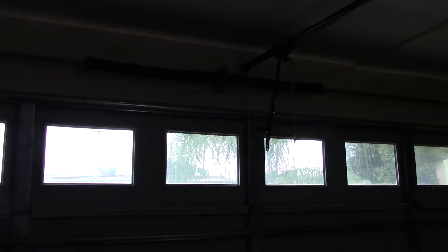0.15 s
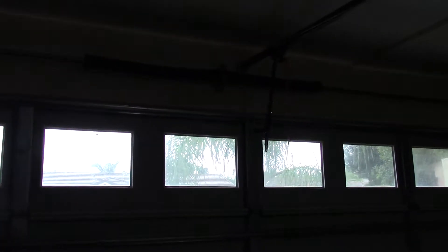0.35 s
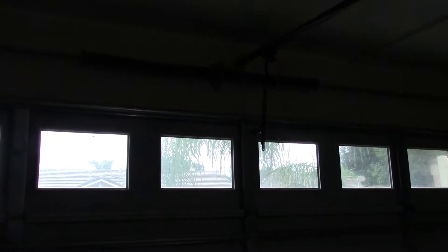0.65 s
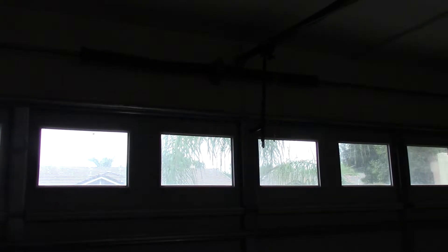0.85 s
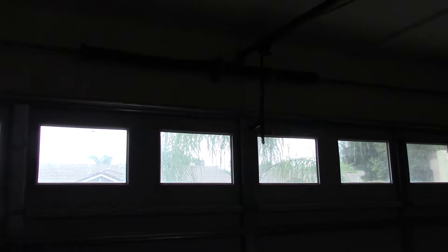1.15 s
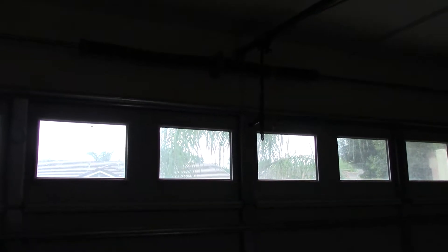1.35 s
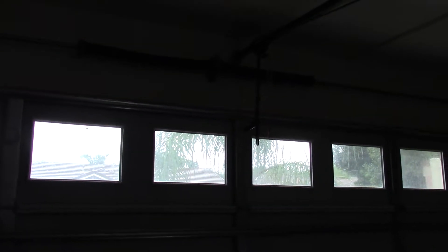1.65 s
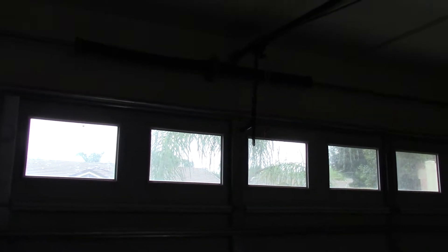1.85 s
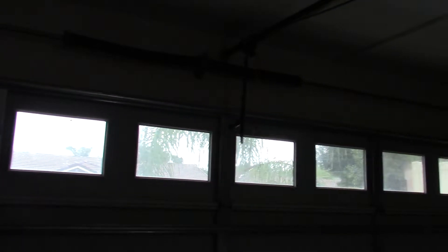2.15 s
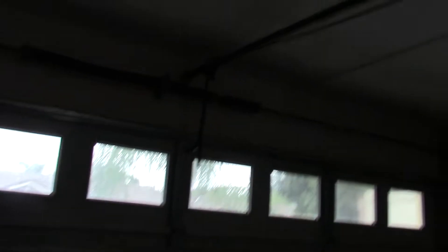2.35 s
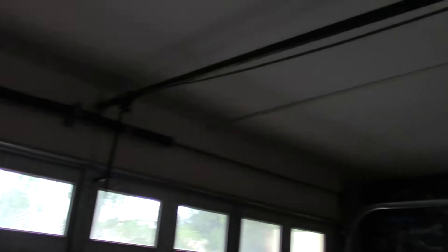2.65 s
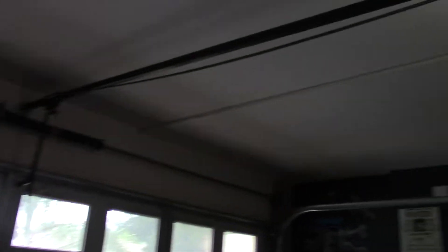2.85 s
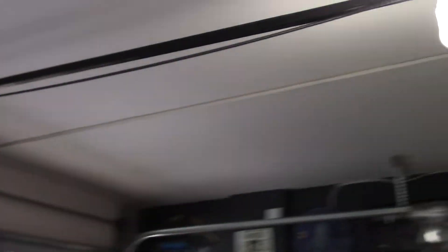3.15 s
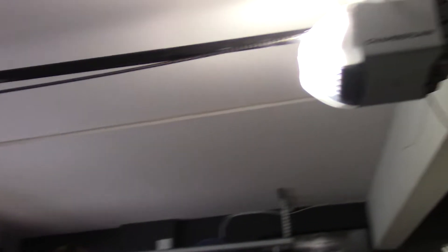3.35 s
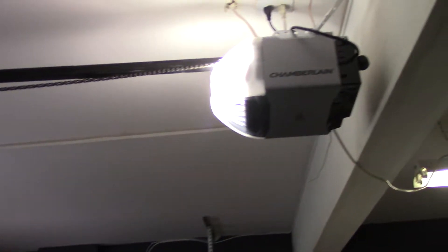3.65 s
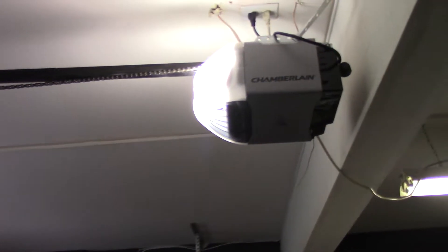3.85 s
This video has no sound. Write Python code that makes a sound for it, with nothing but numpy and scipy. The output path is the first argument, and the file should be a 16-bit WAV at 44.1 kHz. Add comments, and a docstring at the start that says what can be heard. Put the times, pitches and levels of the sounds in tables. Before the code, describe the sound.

A garage door rolls down from the start, its motor humming low while rollers rumble, panels boom, hinges clack and small high squeaks slip through. Around 0.85-0.97 s metal whines and rough thuds land; the motor stops and the garage rings out, with a weak knock at 1.27. Then quiet hiss and low drone, faint camera ticks from 1.7, dull far bumps around 1.5, 2.05, 2.9 and 3.1, and a close plastic click at 3.7.

```python
"""In a garage, a ceiling motor hums while a panel door rolls down its last stretch, squeaks and thuds home.
Rough noise shakes resonant panels and tracks; short noise bursts and dying tones make clacks and blows.
The hum is a stack of sines. Decaying random echoes let the garage ring out.
In the quiet come dull far bumps, faint camera ticks and one close click, over hiss and a low drone."""
import sys
import numpy as np
from scipy import signal
from scipy.fft import rfft, irfft
from scipy.io import wavfile

SR = 44100
rng = np.random.default_rng(int(sys.argv[2]) if len(sys.argv) > 2 else 0)


def wav_record(signal):
    """Record a signal, one row per channel, as 16-bit PCM in the file named by sys.argv[1]."""
    frames = np.transpose(np.atleast_2d(signal))
    bounded = np.clip(frames, -1, 1)
    # unit amplitude maps onto the largest positive 16-bit level
    quanta = np.round(bounded * 32767).astype(np.int16)
    wavfile.write(sys.argv[1], SR, quanta)


N = 176400  # samples, four seconds


def amp(db):
    """Turns decibels into a gain."""
    return 10 ** (np.asarray(db) / 20)


def evened(x):
    """Scales a sound to an RMS of 1."""
    return x / np.sqrt(np.mean(x ** 2) + 1e-20)


def read(points, hz):
    """Reads a curve of (Hz, value) points along log frequency."""
    f, value = np.transpose(points)
    return np.interp(np.log(hz + 1), np.log(f + 1), value)


def add(mix, s, sound):
    """Lays a sound into the mix at s seconds, cut at the end of the mix."""
    part = mix[..., round(s * SR):][..., :sound.shape[-1]]
    part += sound[..., :part.shape[-1]]


def colour(x, points, tilt_db=0):
    """Filters by a spectrum, tilted in dB per octave about 2 kHz."""
    hz = np.fft.rfftfreq(len(x), 1 / SR)
    gain_db = read(points, hz) + tilt_db * np.log2((hz + 100) / 2000)
    return irfft(rfft(x) * amp(gain_db), len(x))


def above(x, hz):
    """Cuts the lows with a second-order high-pass."""
    return signal.sosfilt(signal.butter(2, hz, "high", fs=SR, output="sos"), x)


def resonate(x, hz, width_hz):
    """A two-pole resonance at a steady pitch; a narrower width rings longer."""
    r = np.exp(-np.pi * width_hz / SR)
    return signal.lfilter([1 - r, 0, r - 1], [1, -2 * r * np.cos(2 * np.pi * hz / SR), r * r], x)


def glide(x, hz, width_hz):
    """A resonance that follows a pitch curve: shifts it to zero, smooths, shifts back."""
    turn = np.exp(2j * np.pi * np.cumsum(hz) / SR)
    r = np.exp(-np.pi * width_hz / SR)
    return 2 * (turn * signal.lfilter([1 - r], [1, -r], x / turn)).real


def drift(rate_hz):
    """Slow chance: straight lines between random values drawn rate_hz times a second."""
    knots = rng.standard_normal(1200)
    return np.interp(np.arange(N) / SR * rate_hz, np.arange(1200), knots)


def ring(modes, seconds, scatter_db=0):
    """Dying tones after one blow, each level scattered by chance, peak 1."""
    t = np.arange(round(seconds * SR)) / SR
    x = np.zeros(len(t))
    for hz, db, t60 in modes:
        level_db = db + scatter_db * rng.standard_normal()
        x += amp(level_db - 60 * t / max(t60, .002)) * np.sin(2 * np.pi * hz * t)
    return x / abs(x).max()


def burst(spectrum, tilt_db, t60, rise_s):
    """A dying rattle of coloured noise with a short linear rise."""
    t = np.arange(16384) / SR
    noise = evened(colour(rng.standard_normal(len(t)), spectrum, tilt_db))
    return noise * np.minimum(t / rise_s, 1) * amp(-60 * t / max(t60, .004))


# The rolling door. Each row: time in seconds, panel boom, roller rumble, metal whine and track hiss in dB.
ROLL = [(0.03, -35.5, -28, -66, -46), (0.246, -43.5, -26, -41, -45.5), (0.34, -43.5, -25.5, -36.5, -45),
        (0.596, -23.5, -24, -36.5, -44.5), (0.83, -25.5, -24.5, -54.5, -41),
        (0.885, -33, -18.5, -19.5, -44.5), (0.91, -29.5, -20, -40, -26), (0.968, -30, -48.5, -65, -85.5),
        (1.03, -50.5, -34.5, -73, -98), (1.08, -96, -25, -68, -78)]
ROLL_STOP_S = .03  # after the last row, time to die by 60 dB
# Panel resonances. Each row: pitch in Hz, width in Hz, level in dB.
BOOM = [(294, 35, 3), (336, 25, 4), (363.5, 22, 3), (395.7, 17, 4.5)]
# Whining thin metal. Each row: pitch in Hz at half a second, width in Hz, level in dB.
WHINE = [(2540, 70, -6), (3050, 70, -7), (3320, 75, -1), (3630, 80, 2), (4500, 200, -10)]
WHINE_WANDER, WHINE_SAG_PER_S = 0.0042, .08  # shares of the pitch
WHINE_BED_HZ, WHINE_BED_WIDTH_HZ, WHINE_BED_DB = 3500, 1200, -12.5
# Roller rumble spectrum. Each row: frequency in Hz, relative level in dB per Hz.
RUMBLE = [(40, -57), (90, -14), (180, -8), (300, -6.5), (500, -7), (800, -4.5), (1080, -6.5), (1600, -10.5),
          (2500, -16), (5000, -31), (8000, -69.5)]
RUMBLE_LUMP_DB = 2
# Track hiss spectrum. Each row: frequency in Hz, relative level in dB per Hz.
HISS = [(2350, -22.5), (4000, -4.5), (5910, -4), (9640, -17), (15100, -47.5), (16100, -38), (16400, -57)]
GRIT_PER_S, GRIT_SPREAD_DB, GRIT_SHARE = 1500, 1, 0.4


def rolling():
    """Gritty rollers shake the panels, the tracks and thin metal parts."""
    t, table = np.arange(N) / SR, np.transpose(ROLL)

    # sparse clicks of either sign, mixed with steady noise
    grain = amp(GRIT_SPREAD_DB * np.minimum(rng.exponential(1, N), 5))
    grit = grain * (rng.random(N) < GRIT_PER_S / SR) * rng.choice([-1, 1], N)
    drive = GRIT_SHARE * evened(grit) + (1 - GRIT_SHARE) * rng.standard_normal(N)

    boom = sum(amp(db) * evened(resonate(resonate(drive, hz, 2 * width), hz, width))
               for hz, width, db in BOOM)

    whine = np.zeros(N)
    sag = WHINE_SAG_PER_S * (np.minimum(t, 1.2) - .5)
    for hz, width, db in WHINE:
        pitch = hz * (1 + WHINE_WANDER * drift(11.0) - sag)
        whine += amp(db + 2 * drift(11.0)) * evened(glide(drive, pitch, width))
    bed = resonate(drive, WHINE_BED_HZ, WHINE_BED_WIDTH_HZ)
    bed = resonate(bed, WHINE_BED_HZ, WHINE_BED_WIDTH_HZ)
    whine = evened(whine) + amp(WHINE_BED_DB) * evened(bed)

    rumble = colour(drive, RUMBLE) * amp(RUMBLE_LUMP_DB * drift(29.6))
    layers = boom, rumble, whine, colour(drive, HISS)
    out = sum(evened(x) * amp(np.interp(t, table[0], db)) for x, db in zip(layers, table[1:]))
    return out * amp(-60 * np.clip((t - table[0, -1]) / ROLL_STOP_S, 0, 3))


# The door slab. Each row: nominal pitch in Hz, level in dB before scatter and tilt, t60 in seconds.
SLAB = [(170, -12, .1), (255, -1, .12), (295, 0, .13), (335, 0, .14), (400, -4, .14), (500, -3, .1),
        (670, -5, .08), (830, -12, .08), (1200, -9, .08), (1800, -12, .06)]
SLAB_DETUNE = .08  # share of the pitch; each blow shifts the slab's tones a little by chance
BLOW_T60 = 0.0084  # seconds


def thud(db, tilt_db):
    """A short rough blow sets the door slab ringing."""
    t = np.arange(2000) / SR
    modes = [(hz * (1 + SLAB_DETUNE * rng.uniform(-1.1, 1)), level + tilt_db * np.log2(hz / 400), t60)
             for hz, level, t60 in SLAB]
    slab = ring(modes, .4, 1.8)
    blow = rng.standard_normal(2000) * amp(-60 * t / BLOW_T60)
    x = above(np.convolve(blow, slab), 80)
    return amp(db) * x / abs(x).max()


# The door meeting the floor. Each row: start in seconds, level in dB, brightness in dB per octave.
THUDS = [(.862, -16, 3), (.884, -11, 3), (.908, -6, -2), (0.957, -12, -2), (1.27, -28, 4)]


def thuds():
    """The landing blows, each a fresh ring of the slab."""
    out = np.zeros(N)
    for s, db, tilt_db in THUDS:
        add(out, s, thud(db, tilt_db))
    return out


# Ringing steel hardware. Each row: pitch in Hz, level in dB before scatter and shaping, t60 in seconds.
STEEL = [(3740, -7, .22), (5100, -5, .07), (6600, -6, .05), (7800, 0, .06), (9100, 1, .07),
         (10600, -6, .04), (12200, -6, .05)]
STEEL_DB, STEEL_SCATTER_DB = -5, 3
CLACK_RISE_S, CLACK_TOP_HZ, RATTLE_DB = .001, 14500, 2


def clack(db, hz, octaves, t60):
    """A rough steel rattle around one pitch region, with the ring of the hardware."""
    def shape(f):
        return -6 * (np.log2(f / hz) / max(octaves, .2)) ** 2 - 12 * (f / CLACK_TOP_HZ) ** 8

    spectrum = [(f, shape(f)) for f in np.geomspace(300, 17000, num=24)]
    rattle = burst(spectrum, 0, t60, CLACK_RISE_S)
    steel = ring([(f, level + shape(f), t) for f, level, t in STEEL], .37, STEEL_SCATTER_DB)
    flutter = amp(RATTLE_DB * drift(280)[:len(steel)])
    return amp(db) * (rattle[:len(steel)] * flutter + amp(STEEL_DB) * steel)


# Hinges and rollers. Each row: start in seconds, level in dB, centre of the rattle in Hz,
# width in octaves, t60 of the rattle in seconds.
CLACKS = [(0.121, -27.5, 8100, 11, 0.13), (.347, -28.5, 4770, 0.36, 0.13), (.4305, -43, 12000, 0.41, 0.043),
          (.6135, -43, 9000, .8, 0.24), (0.683, -46, 11000, 0.91, 0.16), (0.718, -39, 8160, 0.65, 0.21),
          (0.776, -34.5, 7900, .7, 0.14), (0.8453, -20.5, 7800, .9, 0.19), (.8795, -18, 5040, 0.58, 0.13),
          (0.8901, -18.5, 3580, 1.13, 0.087), (0.8974, -19.5, 7380, 0.35, 0.14),
          (.915, -43, 4050, 1, 0.077), (.9545, -33.5, 12700, 0.63, 0.11), (1.04, -38.5, 2170, 0.28, 0.33),
          (1.105, -56, 10000, 0.42, 0.13), (1.159, -48, 6160, 0.57, 0.22),
          (1.2646, -42.5, 4580, 0.91, 0.17), (1.335, -55.5, 6040, 0.41, 0.12),
          (1.5615, -58, 11000, 0.66, 0.016)]


def clacks():
    """Hinge and roller clacks as the door comes down, and a few faint ones after it lands."""
    out = np.zeros(N)
    for s, *rest in CLACKS:
        add(out, s, clack(*rest))
    return out


# Squeaks. Each row: start in seconds, length in seconds, first pitch in Hz, last pitch in Hz,
# level in dB, level of the octave in dB against the base tone.
SQUEAKS = [(.168, .085, 6550, 6800, -40, -11), (.345, .025, 6400, 6400, -42, -40),
           (.612, .025, 6200, 6500, -40, -40)]
SQUEAK_THROB_HZ, SQUEAK_THROB = 109, 0.54


def squeaks():
    """Short tones with an octave, a jittery pitch and a fast throb, some of them gliding up."""
    out = np.zeros(N)
    for s, length, from_hz, to_hz, db, octave_db in SQUEAKS:
        t = np.arange(0, length, 1 / SR)
        pitch = from_hz + (to_hz - from_hz) * t / length + 40 * drift(190)[:len(t)]
        turn = 2 * np.pi * np.cumsum(pitch) / SR
        throb = 1 + SQUEAK_THROB * np.sin(2 * np.pi * SQUEAK_THROB_HZ * t)
        swell = np.sin(np.pi * t / length) ** 0.31
        add(out, s, amp(db) * swell * throb * (np.sin(turn) + amp(octave_db) * np.sin(2 * turn)))
    return out


HUM_HZ, HUM_STOP_S, HUM_FADE_S, HUM_WAVER_DB = 120.03, .94, 0.015, 2
# The motor. Each row: time in seconds, lowest hum tone in dB, second tone in dB, all overtones in dB.
MOTOR = [(0.03, -27, -26.5, -29), (0.31, -29.5, -24.5, -27), (0.426, -27.5, -19.5, -32),
         (0.512, -28, -28, -28.5), (0.7, -25.5, -19.5, -31), (0.828, -34, -28, -34.5),
         (0.898, -26, -47.5, -32.5), (0.93, -38, -17.5, -24.5)]
# Overtones. Each row: multiple of the hum, level in dB at half a second against the overtone curve,
# change in dB per second.
OVERTONES = [(3, -2.5, 8), (4, -3.5, 5.5), (5, -4.5, -4), (6, -5, 5), (8, -16.5, 0), (9, -8.5, 2.5)]


def motor():
    """Twice-mains hum with wavering overtones, cut by a short fade as the door comes down."""
    t = np.arange(N) / SR
    s, low_db, second_db, upper_db = np.transpose(MOTOR)
    tones = [(1, np.interp(t, s, low_db)), (2, np.interp(t, s, second_db))]
    for multiple, db, change_db in OVERTONES:
        level_db = db + change_db * (t - .5) + np.interp(t, s, upper_db)
        tones.append((multiple, level_db + HUM_WAVER_DB * drift(9.6)))
    hum = sum(amp(db) * np.sin(2 * np.pi * (multiple * HUM_HZ * t + rng.random()))
              for multiple, db in tones)
    fade = np.clip((HUM_STOP_S - t) / HUM_FADE_S + 1, 0, 1)
    return np.sqrt(2) * hum * fade  # the levels are RMS


# Camera ticks of the focus drive. Each row: start in seconds, level in dB.
TICKS = [(1.709, -51), (2.279, -51), (2.2975, -42.5), (2.398, -54), (2.4962, -52), (2.5471, -53),
         (2.6968, -51), (2.7641, -48), (2.797, -49), (2.8463, -45.5), (2.9981, -48), (3.063, -49),
         (3.2141, -49), (3.3655, -51), (3.3987, -47), (3.4477, -53), (3.5144, -51.5), (3.548, -56),
         (3.5997, -46), (3.6316, -51), (3.6646, -52), (3.7818, -48), (3.819, -48), (3.9317, -48),
         (3.9653, -47)]
# The tone of one tick. Each row: pitch in Hz, level in dB, t60 in seconds.
TICK = [(1620, 0, .035), (1830, -2, .03)]
STEP_HZ, STEP_FROM_S, STEP_DB, STEP_SPREAD_DB = 59.94, 1.7115, -61, 5  # fainter regular drive steps
CLICK_S, CLICK_LEFT_DB, CLICK_RIGHT_DB, CLICK_RISE_S = 3.7177, -11, -4, .0003
# Spectrum of the click's noise. Each row: frequency in Hz, relative level in dB per Hz.
SNAP = [(300, -12), (900, -15), (3200, -3), (5300, 0), (8000, -6), (11000, -13), (14000, -9), (16400, -14)]
SNAP_DB, SNAP_T60, SNAP_TAIL_DB, SNAP_TAIL_T60, TAIL_TILT_DB = -20, .008, -39, .035, -1
# The plastic shell, left and right. Each row: pitch in Hz, level in dB, t60 in seconds.
SHELL_LEFT = [(370, -20, .015), (1210, -16, .022), (1700, -1, .022), (2150, -6, .018), (2300, -3, .008),
              (2950, -6, .012), (3700, -17, .014)]
SHELL_RIGHT = [(370, -22, .015), (1210, -15, .02), (1720, -3, .016), (1980, -1, .012), (2160, -3, .017),
               (2550, -13, .014), (5300, -18, .018)]


def camera():
    """Faint ticks, and one click that rings the plastic shell differently left and right."""
    out = np.zeros((2, N))
    tick = above(ring(TICK, .05), 640)
    steps = np.arange(STEP_FROM_S, N / SR, 1 / STEP_HZ)
    faint = zip(steps, STEP_DB + STEP_SPREAD_DB * rng.standard_normal(len(steps)))
    for s, db in list(TICKS) + list(faint):
        add(out, s, amp(db) * np.array([tick, tick]))

    snap = amp(SNAP_DB) * burst(SNAP, 0, SNAP_T60, .0001)
    snap += amp(SNAP_TAIL_DB) * burst(SNAP, TAIL_TILT_DB, SNAP_TAIL_T60, 0.00081)
    add(out, CLICK_S, np.array([snap, snap]))
    for side, shell, db in (0, SHELL_LEFT, CLICK_LEFT_DB), (1, SHELL_RIGHT, CLICK_RIGHT_DB):
        body = ring(shell, .05)
        rise = np.minimum(np.arange(len(body)) / SR / CLICK_RISE_S, 1)
        body = -above(body * rise, 380)
        add(out[side], CLICK_S, amp(db) * body / abs(body).max())
    return out


# Far bumps. Each row: start in seconds, level in dB, brightness in dB per octave,
# level of the sharp knock in dB.
BUMPS = [(1.5, -58.5, 7, -51), (2.052, -50.5, 1, -48.5), (2.917, -46, -5.5, -55), (3.096, -49, -2.5, -47.5)]
BUMP_T60, BUMP_RISE_S = .5, .006  # seconds
# Spectrum of the knock. Each row: frequency in Hz, relative level in dB per Hz.
KNOCK = [(300, -24), (1200, 0), (1800, -3), (2600, -20), (8000, -36)]
KNOCK_T60 = .09  # seconds


def bumps():
    """Dull knocks somewhere off in the building: a soft noise burst under a sharper, shorter one."""
    dull = [(60, -25), (250, 14), (700, 6.5), (1600, 0), (2600, -10.5), (12000, -43)]  # (Hz, dB per Hz)
    out = np.zeros(N)
    for s, db, tilt_db, knock_db in BUMPS:
        add(out, s, amp(db) * burst(dull, tilt_db, BUMP_T60, BUMP_RISE_S))
        add(out, s, amp(knock_db) * burst(KNOCK, 0, KNOCK_T60, CLACK_RISE_S))
    return out


# Reverberation of the garage. Each row: frequency in Hz, t60 in seconds.
GARAGE = [(60, 1.17), (250, 0.69), (700, 1.193), (2000, 0.92), (3500, 0.74), (5000, 0.52), (10000, 0.34),
          (16000, 0.53)]
# Width of the reverberation. Each row: frequency in Hz, gain of the side tail in dB.
GARAGE_SIDE = [(60, -14.5), (110, -31), (200, -38.5), (380, -26.5), (700, -26.5), (1290, -24), (2380, -20),
               (4400, -15.5), (8120, -11.5), (15000, -28.5)]


def garage(x, wet_db):
    """Sparse random taps dying band by band; a second weak tail, not set by wet_db, makes the side."""
    taps = np.zeros((2, SR + SR // 2))
    at = np.arange(200, taps.shape[1] - 20, 20)
    at = at + rng.integers(0, 20, (2, len(at)))
    np.put_along_axis(taps, at, rng.choice([-1., 1.], at.shape), 1)
    hz, t, bands = signal.stft(taps, SR, nperseg=256)
    dying = bands * amp(-60 * t / read(GARAGE, hz)[:, None])
    tail = signal.istft(dying, SR, nperseg=256)[1]
    wet = signal.fftconvolve(x[None], tail / np.linalg.norm(tail[0]), axes=1)[:, :N]
    mid = x + amp(wet_db) * wet[0]
    side = colour(wet[1], GARAGE_SIDE)
    return np.array([mid + side, mid - side])


# Spectrum of the still air. Each row: frequency in Hz, relative level in dB per Hz.
AIR = [(12, -34), (20, -41), (44, -7), (71, 2), (135, -5), (519, -4.5), (1080, -12.5), (1690, -12),
       (2430, -17.5), (5490, -22.5), (11100, -31.5), (15100, -40.5), (16400, -37)]
AIR_DB = -55.5
# Width of the air. Each row: frequency in Hz, side level against mid in dB.
AIR_SIDE = [(60, -29), (110, -7.5), (200, -4), (380, -6), (700, -7.5), (1290, -6.5), (2380, -7),
            (4400, -9.5), (8120, -12.5), (15000, -12.5)]
FAR_HZ, FAR_WIDTH_HZ, FAR_DB, FAR_WAVER_DB = 66, 8.5, -60.5, 3  # a low drone from outside


def air():
    """Still-room hiss with slight swells, and a low wavering drone of resonant noise."""
    mid_noise, side_noise, drone_noise = rng.standard_normal((3, N))
    mid = evened(colour(mid_noise, AIR)) * amp(AIR_DB + 0.27 * drift(12.0))
    side = colour(evened(colour(side_noise, AIR)), AIR_SIDE) * amp(AIR_DB)
    drone = resonate(resonate(drone_noise, FAR_HZ, FAR_WIDTH_HZ), FAR_HZ, 3 * FAR_WIDTH_HZ)
    mid = mid + amp(FAR_DB + FAR_WAVER_DB * drift(4.3)) * evened(drone)
    return np.array([mid + side, mid - side])


DOOR_LOW_HZ = 88
GARAGE_DB, MOTOR_WET_DB, BUMP_WET_DB = -5.5, -15, -16  # level of the reverberation


def scene():
    """Door, motor and bumps sound in the garage; the camera stays dry, over the air."""
    door = rolling() + clacks() + squeaks() + thuds()
    door = above(above(door, DOOR_LOW_HZ), DOOR_LOW_HZ)
    out = garage(door, GARAGE_DB) + garage(motor(), MOTOR_WET_DB) + garage(bumps(), BUMP_WET_DB)
    return out + camera() + air()


EDGE_HZ = 16000


def record(dry):
    """Limits the band with a steep low-pass."""
    lowpass = signal.firwin(511, EDGE_HZ, window=("kaiser", 9), fs=SR)
    return signal.oaconvolve(dry, lowpass[None], "same")


dry = scene()
out = record(dry)
wav_record(out)
```